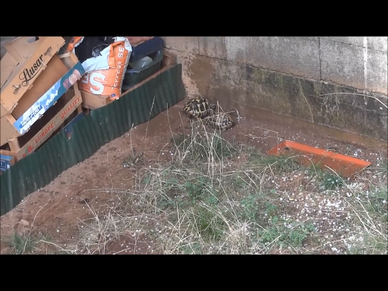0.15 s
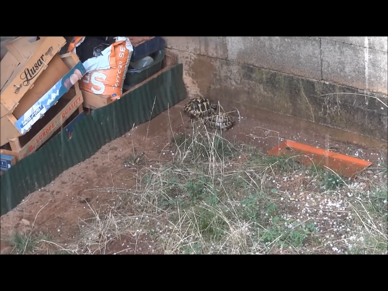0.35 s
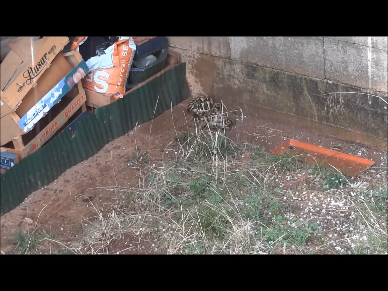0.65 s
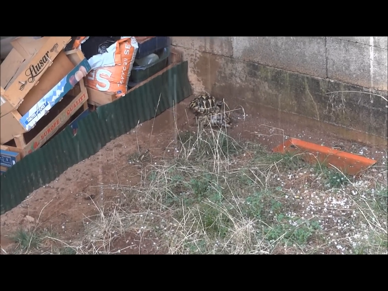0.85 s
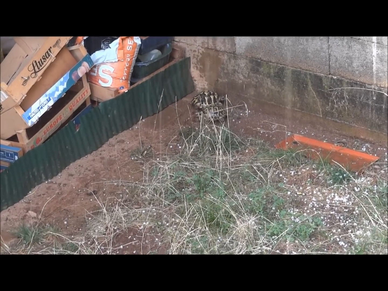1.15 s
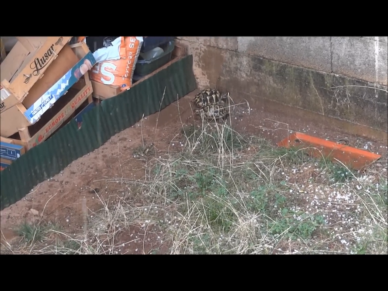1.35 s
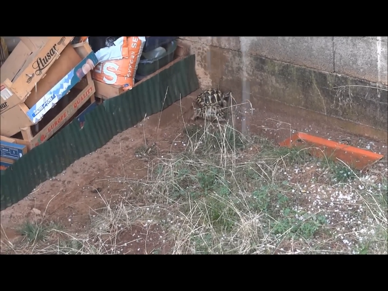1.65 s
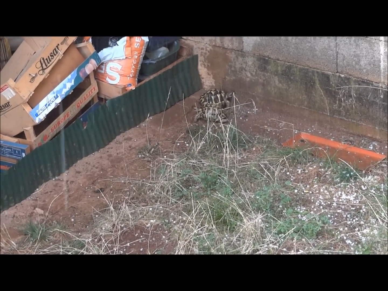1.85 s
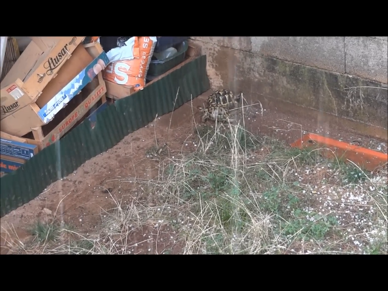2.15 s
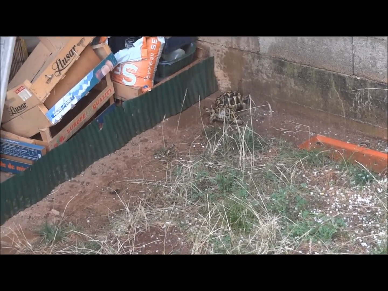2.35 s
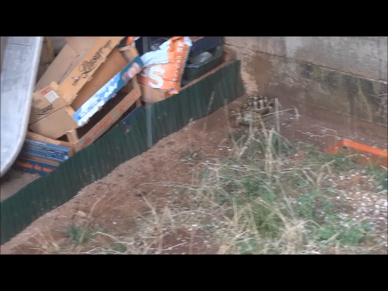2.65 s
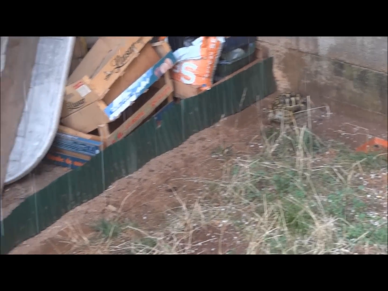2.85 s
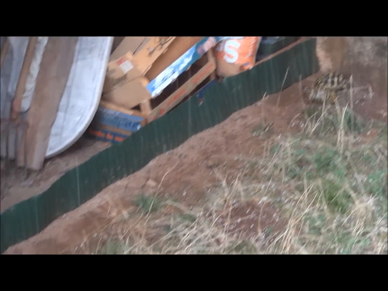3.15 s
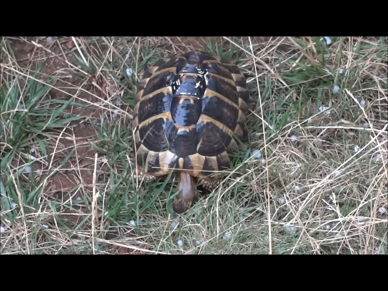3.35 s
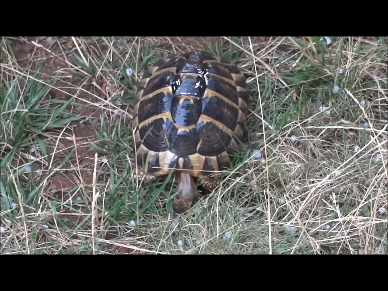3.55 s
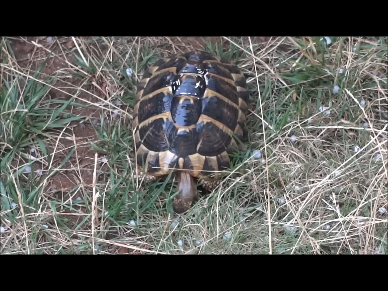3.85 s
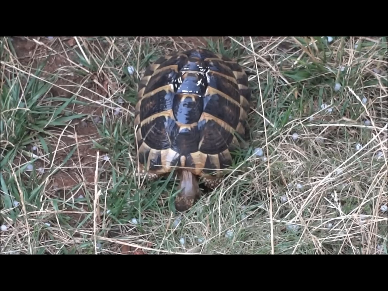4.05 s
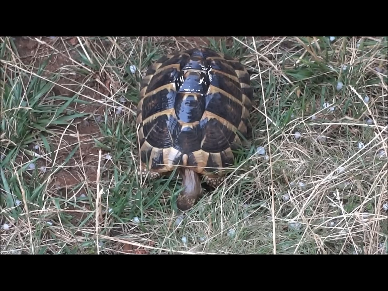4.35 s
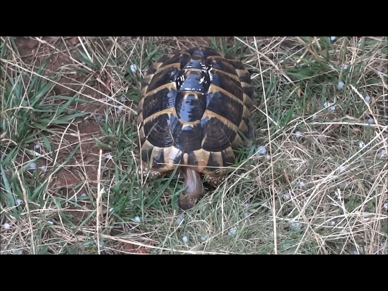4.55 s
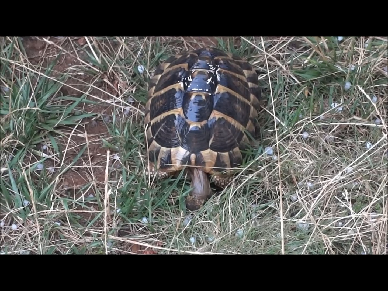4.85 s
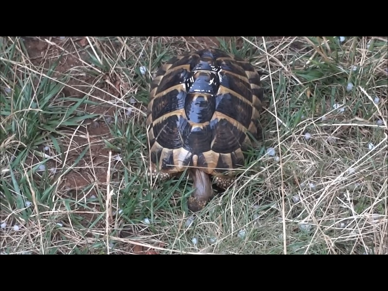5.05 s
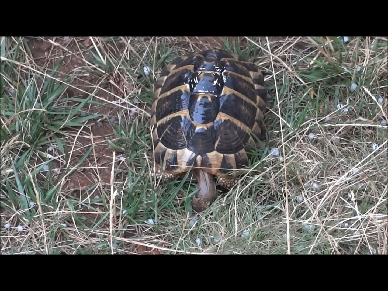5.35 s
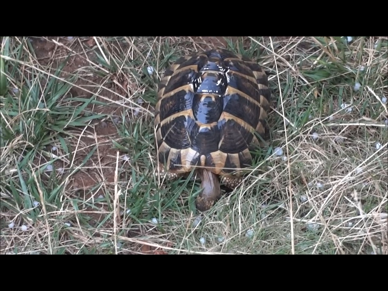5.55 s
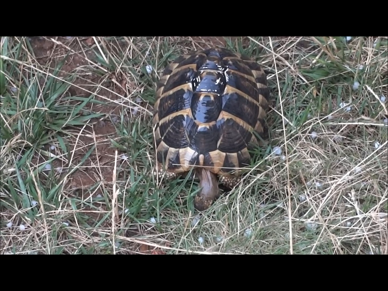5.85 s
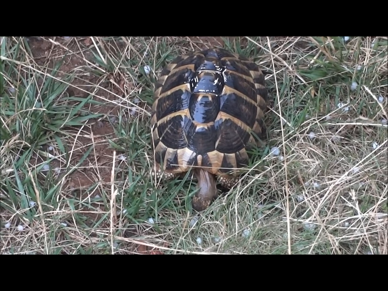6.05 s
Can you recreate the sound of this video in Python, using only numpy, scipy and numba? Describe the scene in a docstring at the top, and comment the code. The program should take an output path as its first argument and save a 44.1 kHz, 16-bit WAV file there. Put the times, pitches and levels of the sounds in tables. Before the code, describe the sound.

Dense downpour with crisp close ticks and small wet plops, abruptly dropping out midway before returning with a subtly different colour.

```python
"""Heavy rain roars on grass, soil and boxes in a walled yard, heard by two close microphones.
The roar is noise from countless far drops, coloured by the yard. Nearer drops are short fading tones
that tick, plop, tap or ring, and runoff splashes are bursts of noise.
The sound is cut out for about half a second, then returns at a second spot with another colour."""
import sys
import numpy as np
from scipy import signal
from scipy.fft import rfft, irfft, next_fast_len
from scipy.io import wavfile
from scipy.ndimage import uniform_filter1d
from numba import njit

SR = 44100
rng = np.random.default_rng(int(sys.argv[2]) if len(sys.argv) > 2 else 0)


def dump_mix(stems):
    """Bounce the given channels to the path in sys.argv[1] as a 16-bit WAV at rate SR."""
    frames = np.atleast_2d(stems).T  # one column per channel
    limited = np.clip(frames, -1, 1)  # hard clip at full scale
    pcm = np.round(limited * 32767).astype(np.int16)
    wavfile.write(sys.argv[1], SR, pcm)


N = 274302
T = np.arange(N) / SR  # time in s
M = next_fast_len(N)  # a length that transforms quickly
F = np.maximum(np.arange(M // 2 + 1) * SR / M, 1.)  # frequencies in Hz, kept above zero for logarithms

LEFT_DB = .5  # how much louder the left side is
TOP_HZ = 15730  # nothing much is heard above this
MOVE_S = 3.6  # the second spot begins, within the silence
BASS_HOLD = 0.34  # share of a swell (in dB) that the bass does not follow
# the sound drops at once, dies away, then is gone
CUT_S, CUT_STEP_DB, CUT_FALL_DB_PER_S, SILENT_S = 3.3558, -16, 560, 3.391
RESUME_S, FADE_IN_S = 3.836, 0.024


def undb(db):
    """Turn decibels into gain."""
    return 10 ** (np.asarray(db) / 20)


def level(x, db):
    """Scale a sound to an rms (average) level."""
    return x * undb(db) / np.sqrt(np.mean(x ** 2))


def over_hz(table):
    """Read a (f/Hz, value) table at every frequency, with pitch-like (logarithmic) spacing."""
    hz, value = np.transpose(table)
    return np.interp(np.log(F), np.log(hz), value)


def walk(rate):
    """Wander at random: levels held for 1 / rate seconds, smoothed twice, with a spread near 1."""
    k = int(SR / rate)
    steps = np.repeat(rng.standard_normal(N // k + 1), k)
    smooth = uniform_filter1d(uniform_filter1d(steps, k), k)
    return 1.23 * smooth[:N]


@njit
def grains(s, hz, decay_s, size, pan_db, glide, rise):
    """Each drop is a fading sine that swells, may glide up in pitch, and sits between left and right."""
    out = np.zeros((2, N))
    for k in range(len(s)):
        start = int(s[k] * SR)
        # this factor makes size the peak of the swell
        z = size[k] * (1 + rise) * (1 + 1 / rise) ** rise + 0j
        side = 10 ** (pan_db[k] / 40)
        n = int(5 * decay_s[k] * SR) + 2
        turn = np.exp(2j * np.pi * hz[k] / SR - 1 / (decay_s[k] * SR))  # one sample of spin and fading
        bend = np.exp(2j * np.pi * hz[k] * glide / n / SR)  # speeds up the spin bit by bit
        gap = 1.  # what is still missing from the full swell
        close = np.exp(-1 / (rise * decay_s[k] * SR))
        for j in range(min(n, N - start)):
            gap *= close
            out[0, start + j] += (1 - gap) * z.imag * side
            out[1, start + j] += (1 - gap) * z.imag / side
            z *= turn
            turn *= bend
    return out


def scatter(s, db, hz, decay_s, pan_db, count, spread_s, detune, glide, rise):
    """Each drop breaks into a few droplets, a little later, weaker and off pitch."""
    u = rng.random((len(s), count, 3)).T
    u[:, 0] = [[0], [.5], [0]]  # the first droplet is the drop itself
    late, pitch, weak = u
    same = np.zeros_like(late)  # repeats a drop's value for all its droplets
    parts = (s + spread_s * late, hz * np.exp(detune * (pitch - .5)), decay_s + same,
             undb(db - 9.1 * weak), pan_db + same)
    return grains(*(p.ravel() for p in parts), glide, rise)


def shower(count, size, lo_hz, hi_hz, cycles, db, spread_db, spread_s, detune, pan_db):
    """Drops at random moments and bearings, many small and few large; each makes `size` droplets."""
    when, pitch, strength, bearing, ring = rng.random((count, 5)).T
    hz = lo_hz * (hi_hz / lo_hz) ** pitch
    db = db + np.minimum(-spread_db * np.log(strength + 1e-9), 3.2 * spread_db)
    decay_s = cycles * (0.5 + 1.2 * ring) / hz
    return scatter(when * N / SR, db, hz, decay_s, LEFT_DB + pan_db * (bearing - .5),
                   count=size, spread_s=spread_s, detune=detune, glide=0.057, rise=.3)


def roar(treble_db, bass_db):
    """Far drops merge into noise; every band swells with its neighbours and flickers alone."""
    # tone of the far rain: f/Hz, relative level per Hz/dB
    rain_colour = [(15, -57), (25, -19.5), (80, -12), (129, -7), (222, -2), (307, -4.5), (472, -3),
                   (635, -1.5), (746, 0), (1430, 0), (1550, -2.5), (1870, -2), (4540, -8), (13400, -12),
                   (15700, -13.5)]
    # resonances of the yard: f/Hz, width/Hz, boost/dB
    yard_resonances = [(133.6, 42, 4.5), (221.6, 58, 3.5), (499, 120, 4), (760, 190, 1.5), (885, 55, 1),
                       (1590, 100, 3.5), (1700, 66, 3)]
    # average stereo width, before its random wavering: f/Hz, side minus middle/dB
    stereo_width = [(60, -22), (110, -18.5), (200, -18), (380, -14), (700, -14), (1290, -13), (2380, -13.5),
                    (4400, -13.5), (8120, -15), (15000, -23.5)]
    # change of colour at the second spot: f/Hz, change/dB
    second_colour = [(50, 2.5), (130, -2.5), (300, 0), (600, -1), (1200, 1), (2000, 0.5), (3200, 2),
                     (6000, 0), (14000, 0)]
    colour_db = over_hz(rain_colour)
    for hz, width, db in yard_resonances:
        colour_db = colour_db + db / (1 + (2 * (F - hz) / width) ** 2)
    mid, side = (rfft(rng.standard_normal(M)) * undb(colour_db) for _ in range(2))
    side = side * undb(over_hz(stereo_width))
    second_hz, second_db = np.transpose(second_colour)

    centres = 30 * 2 ** np.arange(0, 9.6, .5)  # bands half an octave apart, in Hz
    place = np.interp(np.log(F), np.log(centres), np.arange(len(centres)))
    gusts = [walk(25) for _ in range(7)]  # each is shared by up to three neighbouring bands
    out = 0
    for k, hz in enumerate(centres):
        share = np.clip(1 - abs(place - k), 0, 1)  # neighbouring bands overlap
        m = irfft(mid * share, M)[:N]
        s = irfft(side * share, M)[:N]
        bright = np.clip(np.log2(hz / 2000) / 1.8, 0, 1)  # 0 up to 2 kHz, 1 from 7 kHz
        deep = np.clip(np.log2(500 / hz), 0, 1)  # 0 from 500 Hz up, 1 up to 250 Hz
        moved_db = (T > MOVE_S) * np.interp(np.log(hz), np.log(second_hz), second_db)
        flicker_db = 0.45 * gusts[k // 3] + .7 * walk(40)
        db = bright * treble_db + deep * bass_db + moved_db + flicker_db
        s = s * undb(1.9 * walk(12))  # the stereo width wavers at random
        out = out + undb(db) * np.array([m + s, m - s])
    return level(out, 0.76) * undb([[LEFT_DB / 2], [-LEFT_DB / 2]])


def patter():
    """Mid-distance drops: dry clicks on straw and card, plops in wet soil, dull taps on boxes."""
    clicks = shower(count=600, size=4, lo_hz=4500, hi_hz=13700, cycles=1.3, db=-9.5, spread_db=5.0,
                    spread_s=0.022, detune=.3, pan_db=8.5)
    plops = shower(count=600, size=4, lo_hz=1407, hi_hz=4970, cycles=5.5, db=-10.5, spread_db=3.0,
                   spread_s=.03, detune=.35, pan_db=3.5)
    taps = shower(count=450, size=4, lo_hz=707.7, hi_hz=1886, cycles=7.2, db=-12.0, spread_db=2.0,
                  spread_s=0.038, detune=.4, pan_db=7.5)
    return clicks, plops + taps


def spits():
    """Very short, high ticks, each of two droplets."""
    return shower(count=160, size=2, lo_hz=5500, hi_hz=14000, cycles=.7, db=3, spread_db=1.6,
                  spread_s=.012, detune=.4, pan_db=6.0)


def near_drops():
    """Ticks die faster the wider their band of pitches; rings swell softly amid their own spatter."""
    # loudest near drops on hard things: t/s, peak of the swell/dB, centre f/Hz, width/Hz, left minus right/dB
    hard_ticks = [(0.0768, -8, 6960, 10300, 7), (0.1969, -9, 7700, 9800, 3), (0.2044, -6, 7580, 9800, 5),
                  (0.5447, -6, 11800, 9800, 7), (0.6811, -5, 12170, 9400, 0), (0.6968, -10, 12280, 7200, 2),
                  (0.7766, -6, 11720, 7000, 0.1), (0.848, -4, 6780, 7200, 1.5),
                  (0.8705, -7.5, 6620, 1900, 3), (1.1364, -2.5, 12120, 6600, 5),
                  (1.2988, -12, 10200, 7000, 0.8), (1.3315, -7, 13640, 7000, -2.7),
                  (1.385, -5, 10840, 1800, -0.1), (1.3994, -4, 11570, 7000, 3),
                  (1.4661, -7, 11300, 9400, 0.1), (1.657, -11, 7420, 9200, 0.9),
                  (1.6695, -9, 11180, 10200, 1.1), (1.8895, -14, 7530, 9200, 0.9),
                  (2.1414, -6, 9070, 9800, 1.2), (2.1788, -12, 9510, 8600, 0.2),
                  (2.1852, -9, 8700, 3000, 0), (2.2074, -6, 9980, 8400, 0.3), (2.3631, -4, 9940, 7200, -2),
                  (2.4449, -6, 11990, 11200, 0.1), (2.5074, -8, 11100, 7000, 0.4),
                  (2.5898, -7, 11250, 7000, -1), (2.713, -2, 10240, 9000, 0), (2.736, -7, 12670, 7000, 0.1),
                  (2.8324, -8, 8880, 7800, 3), (2.856, -8, 8370, 7000, 0.7), (3.0277, -7, 9370, 10200, -1),
                  (3.2076, -2.5, 9800, 6000, 3.5), (3.281, -7, 8650, 10000, -2.3),
                  (4.2176, -11, 8370, 7000, 6), (4.3344, -6, 10840, 6000, 0.6),
                  (4.3616, -9, 7260, 6600, -0.5), (4.4085, -9, 9200, 7400, 0.1),
                  (4.709, -1.5, 10460, 6400, 2), (4.8316, -10, 5410, 2200, 2.4),
                  (5.1186, -7, 8810, 7000, 0.3), (5.6236, -7, 8770, 9800, 2),
                  (5.9157, -9, 9180, 1900, -0.2)]
    # loudest drops that ring a bubble or a hollow:
    # t/s, peak of the swell/dB, starting f/Hz, decay/s, left minus right/dB
    hollow_rings = [(0.018, -17, 930, 0.0024, 1), (0.038, -16.5, 1200, 0.0046, 0.4),
                    (0.704, -17, 1680, 0.002, 5), (0.827, -20, 473, 0.0041, 2),
                    (1.018, -17, 3810, 0.0019, 4), (1.233, -17, 4050, 0.0022, 1.0),
                    (1.262, -14, 1500, 0.003, 3), (1.286, -21, 1520, 0.0051, 0.7),
                    (1.302, -16, 4100, 0.0015, -0.7), (1.348, -18, 1064, 0.0028, 0.3),
                    (2.39, -17.5, 1530, 0.0026, 0.3), (2.5485, -15, 4200, 0.00097, 0),
                    (3.901, -19, 4270, 0.0015, -6.9), (3.923, -21, 2910, 0.0025, 2),
                    (3.945, -23, 1655, 0.0044, 1.1), (4.18, -20, 1330, 0.0032, 0.4),
                    (4.654, -20, 1000, 0.0021, 0.7), (5.112, -20, 1020, 0.0037, 4),
                    (5.12, -18, 3550, 0.0022, -4), (5.193, -23, 3010, 0.0042, 2),
                    (5.22, -17, 2000, 0.004, 0.3), (5.226, -21, 1260, 0.0035, -0.8),
                    (5.325, -20, 1950, 0.0025, 7), (5.326, -14, 1530, 0.0023, -0.5),
                    (5.436, -21, 750, 0.0047, 3), (5.488, -18, 1750, 0.0025, 1.2),
                    (5.509, -21, 3400, 0.0019, -0.3), (5.61, -21, 2850, 0.005, 0),
                    (5.94, -16.5, 3160, 0.0021, 2), (6.025, -15.5, 1240, 0.0026, 4),
                    (6.051, -20, 510, 0.004, 3)]
    s, db, hz, width, pan = np.transpose(hard_ticks)
    ticks = grains(s, hz, 1.9 / (np.pi * width), undb(db), pan, 0., 0.71)
    rings = scatter(*np.transpose(hollow_rings), count=3, spread_s=.012, detune=0.15, glide=0.022, rise=0.77)
    return ticks + rings


def splashes():
    """Runoff lands in a burst of spray: broad noise with a quick rise and a short tail."""
    # t/s, rms level before the rise and tail/dB, f that sets the band/Hz, time scale/s, left minus right/dB
    runoff = [(1.012, -23, 4280, 0.029, 3), (1.299, -24, 4640, 0.028, 0), (1.657, -26, 5890, 0.029, 3),
              (1.874, -22.5, 5160, 0.036, 2), (2.173, -25.5, 6720, 0.022, 0.5),
              (2.28, -18.5, 5180, 0.04, 4.5), (2.708, -25, 6100, 0.025, -0.5),
              (5.978, -24.5, 5250, 0.026, -1)]
    out = np.zeros((2, N))
    for s, db, hz, length, pan in runoff:
        i, n = int(s * SR), int(.15 * SR)
        uneven_db = 2.5 * np.repeat(rng.standard_normal(n // 32 + 1), 32)[:n]  # droplets land unevenly
        noise = rng.standard_normal(n) * undb(uneven_db)
        age = np.arange(n) / SR / max(length, .004)
        shape = 3.67 * age * np.exp(1 - 2.97 * age)  # peaks after a third of the time scale
        band = signal.butter(1, [hz / 4, min(1.9 * hz, .45 * SR)], "band", fs=SR, output="sos")
        spray = level(signal.sosfilt(band, noise), db) * shape
        out[:, i:i + n] += (spray * undb([[pan / 2], [-pan / 2]]))[:, :N - i]
    return out


def scene():
    """One rainfall curve drives roar, patter and spits; near drops and splashes stand on their own."""
    # strength of the downpour: t/s, level/dB, treble against the middle/dB (only its ups and downs are used)
    downpour = [(0.0, -20.5, -4.5), (0.27, -21, -4), (0.65, -20, -3.5), (0.95, -20, -3.5),
                (1.02, -18.5, -5.5), (1.355, -17, -4), (1.375, -24, -2.5), (1.48, -21.5, -3.5),
                (1.8, -22, -3.5), (2.0, -20.5, -4.5), (2.4, -19.5, -4), (2.64, -21, -3), (2.76, -22, -3.5),
                (3.35, -22, -3), (3.86, -20.5, -6), (4.2, -20.5, -3.5), (4.55, -20, -5.5),
                (5.05, -22.5, -4.5), (5.33, -21, -4.5), (5.4, -21, -4), (5.8, -20.5, -5), (5.97, -22, -3.5),
                (6.02, -19.5, -5.5), (6.09, -21.5, -5), (6.22, -21, -4.5)]
    s, *columns = np.transpose(downpour)
    rain_db, treble_db = (np.interp(T, s, c) for c in columns)
    treble_db = treble_db - treble_db.mean() + 0.69 * walk(50)
    bass_db = -BASS_HOLD * (rain_db - rain_db.mean())
    clicks, plops = patter()
    wetter_db = 0.76 * (T > MOVE_S)  # wetter ground at the second spot
    far = roar(treble_db, bass_db) + (clicks + spits()) * undb(treble_db) + plops * undb(wetter_db)
    return far * undb(rain_db + 0.65 * walk(12)) + near_drops() + splashes()


def record(dry):
    """The microphones lose the deepest bass, the sound is muted between two spots, the top is cut steeply."""
    dying = undb(CUT_STEP_DB - CUT_FALL_DB_PER_S * (T - CUT_S).clip(0))
    dying = dying * np.clip((SILENT_S - T) / 0.0065, 0, 1)  # the last 6.5 ms run down to silence
    back = np.sin(np.pi / 2 * np.clip((T - RESUME_S) / FADE_IN_S, 0, 1)) ** 1.7
    gain = np.where(T < CUT_S, 1, dying) + back
    heard = signal.sosfilt(signal.butter(2, 30, "high", fs=SR, output="sos"), dry) * gain
    return signal.sosfilt(signal.ellip(14, .2, 80, TOP_HZ, fs=SR, output="sos"), heard)


dry = scene()
out = record(dry)
dump_mix(out)
```